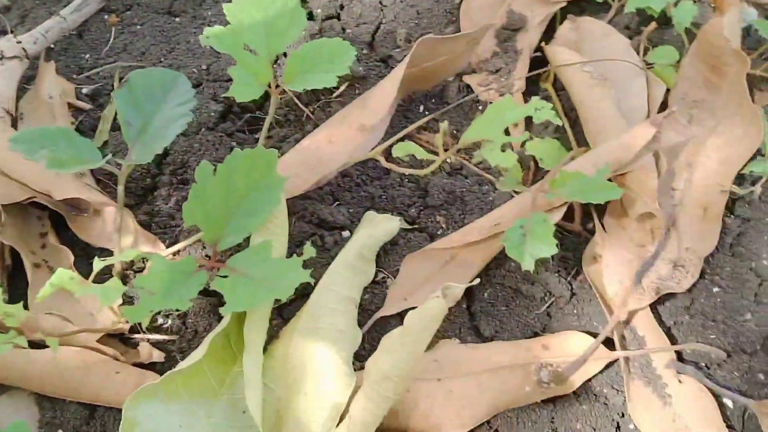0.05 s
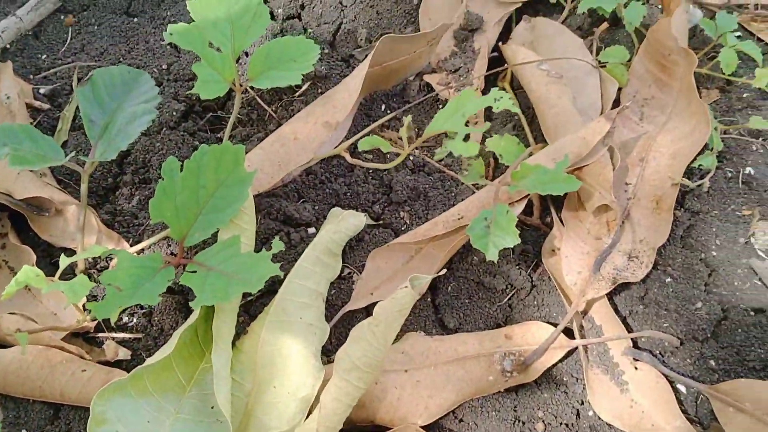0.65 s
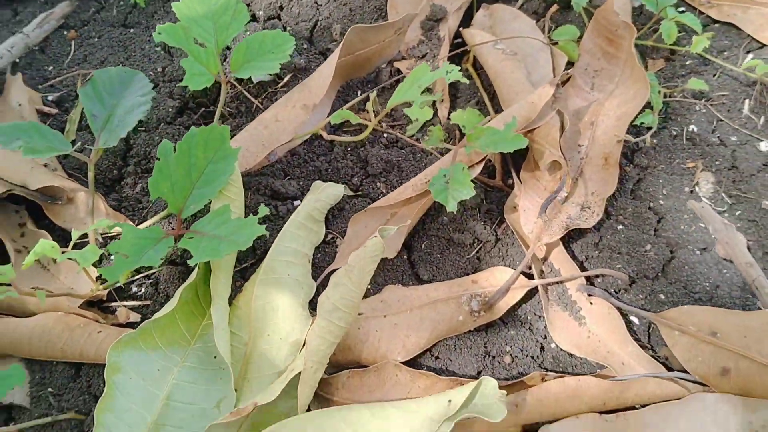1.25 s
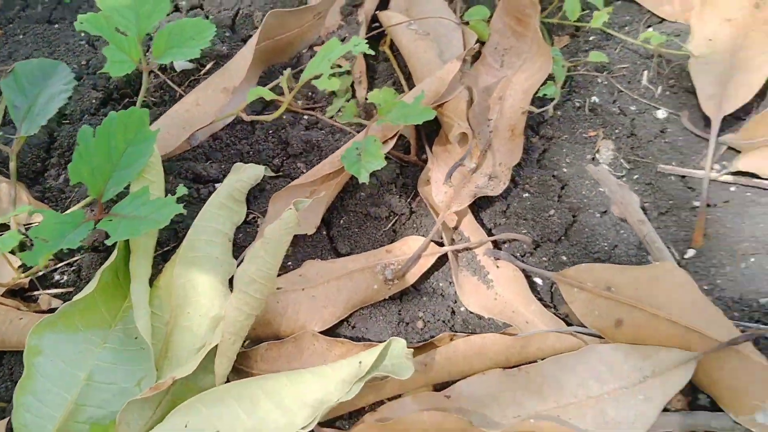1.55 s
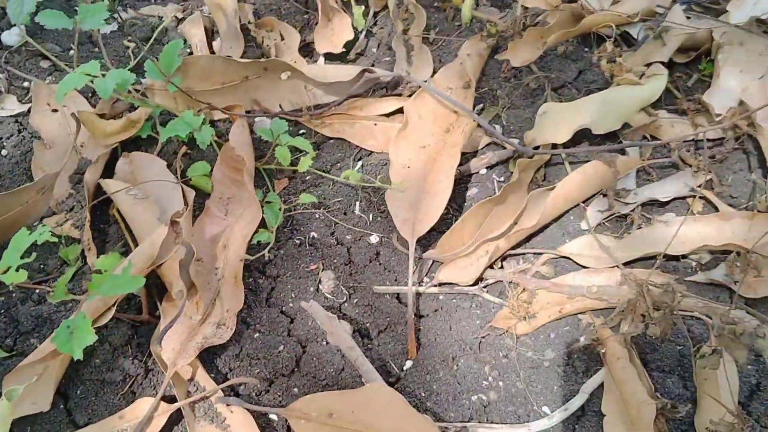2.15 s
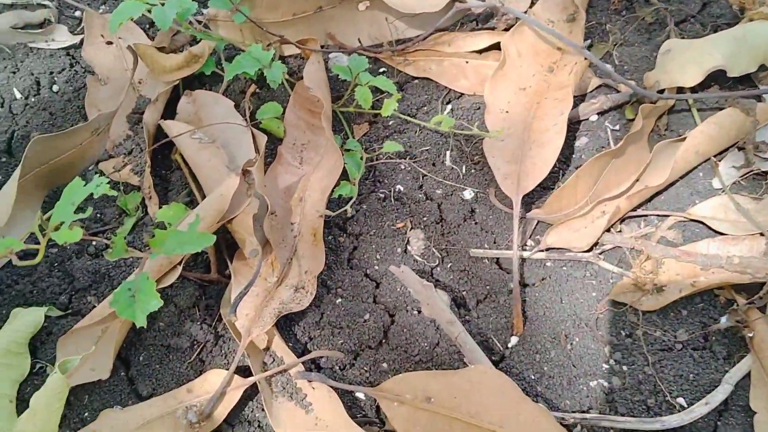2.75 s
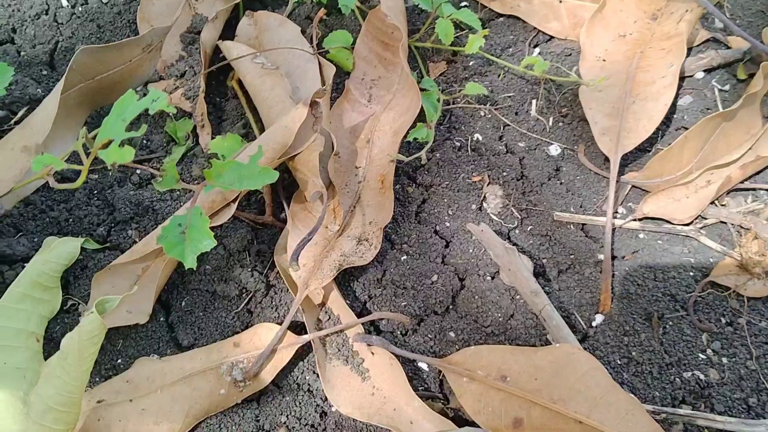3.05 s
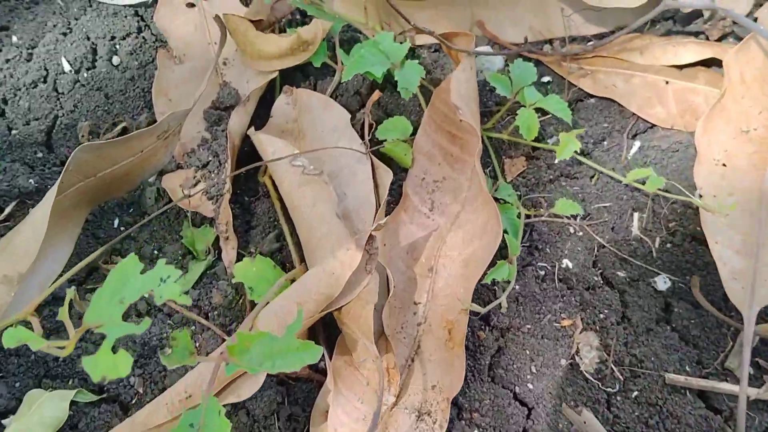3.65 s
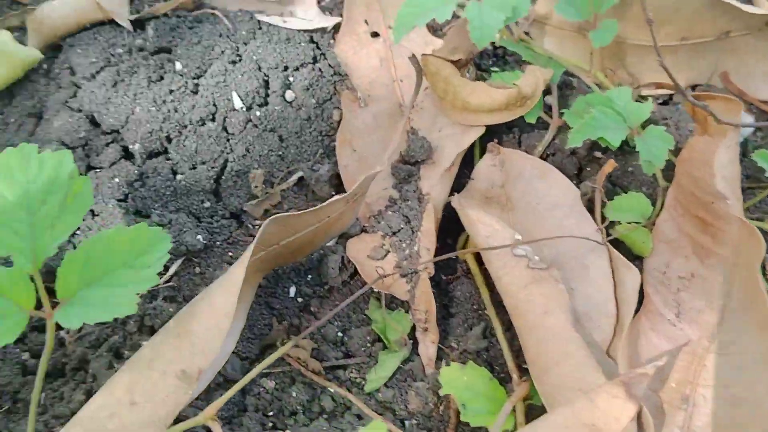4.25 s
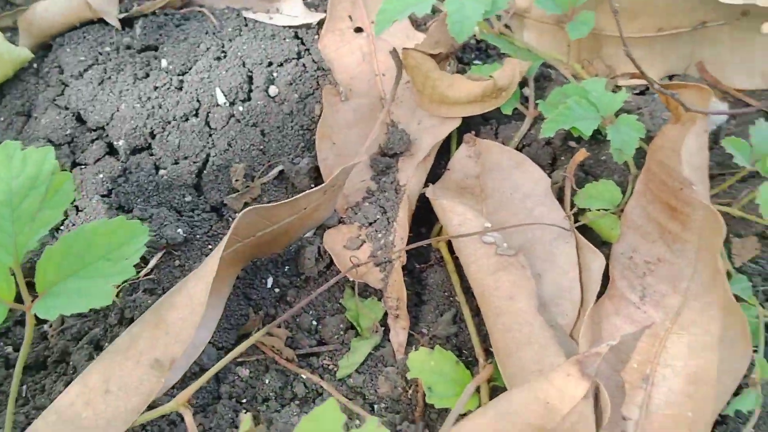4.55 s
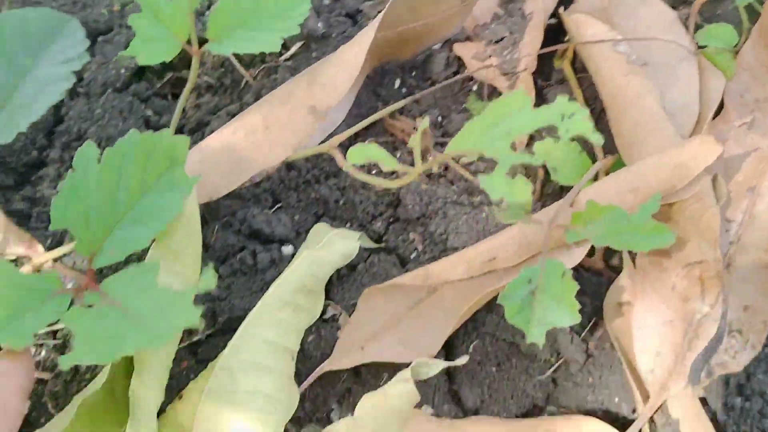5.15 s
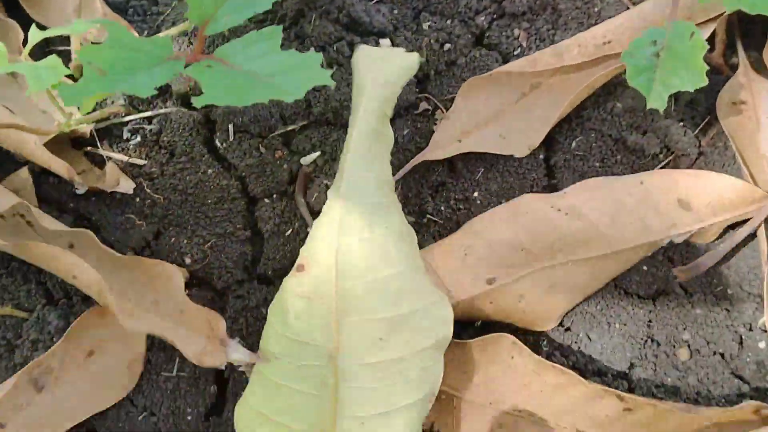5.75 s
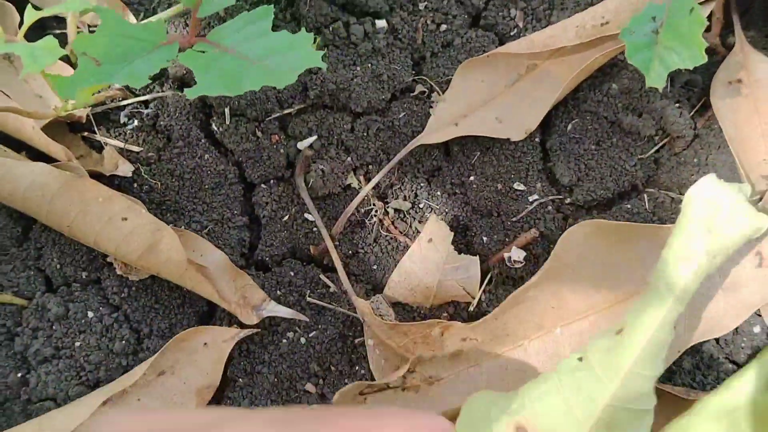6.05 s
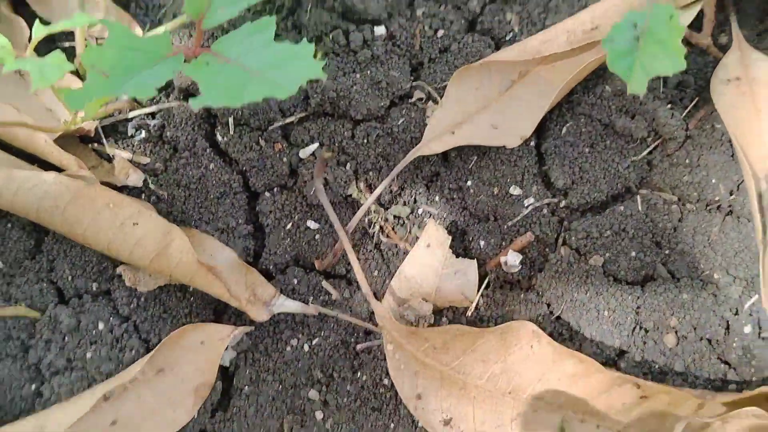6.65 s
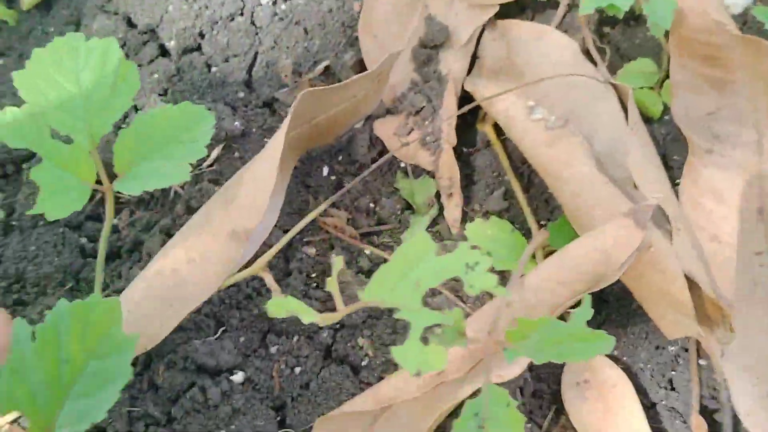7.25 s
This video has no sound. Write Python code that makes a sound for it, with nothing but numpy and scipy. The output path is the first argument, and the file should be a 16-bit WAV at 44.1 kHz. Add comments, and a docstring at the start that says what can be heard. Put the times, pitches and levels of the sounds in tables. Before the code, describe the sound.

Close, irregular bursts of crisp rustling and sharp cracks from dry fallen leaves being moved, over a low outdoor rumble and distant birds.

```python
"""Dry leaves rustle and crackle right at the microphone: a hand pushes a curled leaf through fallen
leaves on bare soil. Edges catch and slip over each other and make the stiff blades ring; veins and rims
give way in sharp snaps, and crumbs tick. Three faint, very high squeaks come and go.
Far off, a few birds whistle over the low rumble and faint hush of the open air."""
import sys
import numpy as np
from scipy import signal
from scipy.fft import rfft, irfft
from scipy.io import wavfile

SR = 44100
rng = np.random.default_rng(int(sys.argv[2]) if len(sys.argv) > 2 else 0)


def store_wav(level_fs):
    """Save 16-bit WAV to argv[1]."""
    pcm = np.round(np.clip(np.atleast_2d(level_fs), -1, 1) * 32767)
    wavfile.write(sys.argv[1], SR, pcm.T.astype(np.int16))


N = 330750
TIME = np.arange(N) / SR

# Table levels are relative. Ring, body and rasp are the three bands of the leaf sound (see leaf_parts).
# strokes of the hand: start t/s, slip rate/(1/s), spread of slip sizes/dB, depth of catching/dB
STROKES = [(0, 3100, 4.5, 2.6), (1.441, 3800, 4.5, 2.5), (1.901, 1250, 4, 4.5), (4.55, 5600, 4.5, 0.5),
           (4.831, 5000, 2.5, 1.7), (5.449, 7000, 6, 1.4), (6.151, 1400, 5, 1.5)]
# main resonances of the leaves touched, one table a stroke: f/Hz, width/Hz, weight/dB
NUDGED = [(1150, 170, -3), (2470, 93, 25), (2970, 177, 10), (4750, 125, 0)]
PUSHED = [(535, 47, 2), (1210, 270, 0), (1720, 130, -6), (2250, 17, -4), (2560, 270, 9), (3470, 58, -7),
          (4430, 33, -19), (4800, 85, 7)]
BENT = [(2860, 830, 0)]
GRIPPED = [(1900, 115, 37), (2660, 22, -5), (3600, 360, 19), (3620, 74, 0), (4796, 100, -10)]
DRAGGED = [(1060, 120, -1), (1820, 56, -16), (2870, 300, -1), (5030, 280, -8)]
LIFTED = [(1030, 185, 8), (1810, 85, -2), (2572, 100, 0), (3470, 820, -11)]
CRUMPLED = [(1080, 37, 1), (1640, 93, 9), (3030, 78, 15)]
# broad colour of dry leaf on leaf, close up: f/Hz, level/dB
LEAF_COLOUR = [(150, -41), (250, 18.5), (329, 1), (516, 0), (691, -3), (1160, -4), (1530, -6.5), (1780, -6),
               (2560, -2), (3380, -1), (4300, -10), (5110, -11.5), (6850, -22.5), (9340, -17), (15400, -26)]
# short shoves: full force t/s, rise/s, hold/s, fall/s, ring/dB, body/dB, rasp/dB
SHOVES = [(0.533, 0.39, 0.3, 0.22, -61, -51, -62), (0.78, 0.024, 0.035, 0.38, -44, -42.5, -48.5),
          (1.077, 0.074, 0.012, 0.13, -28, -32.5, -35), (1.214, 0.031, .01, 0.038, -29.5, -33.5, -43),
          (1.271, 0.015, 0.046, 0.13, -33, -32.5, -36.5), (1.379, 0.045, 0.037, 0.053, -22, -36, -38),
          (1.467, 0.046, 0.0089, 0.26, -28.5, -29.5, -32.5), (1.571, 0.18, 0.012, 0.049, -26, -23, -51),
          (1.687, 0.084, 0.016, 0.18, -24, -27, -30.5), (1.974, 0.059, 0.076, 0.051, -32, -36, -35.5),
          (2.15, 0.0089, .005, 0.074, -35, -35.5, -36.5), (2.65, 0.12, .04, .1, -35, -39, -44),
          (2.734, .06, 0.022, 0.29, -35, -39.5, -35), (2.88, 0.074, 0.0086, 0.095, -35, -39, -37),
          (3.116, 0.32, 0.16, .45, -44, -40, -41.5), (3.481, .06, .01, 0.22, -40.5, -40, -45),
          (3.916, 0.11, .03, 0.11, -50, -48, -50), (4.49, 0.66, 0.088, .15, -49.5, -46, -51),
          (6.039, 0.022, .008, 0.048, -23, -29.5, -31), (6.556, 0.47, 0.039, .2, -49.5, -49.5, -57),
          (7.39, .15, 0.035, .3, -47.5, -52, -55)]
# three long drags through the litter, one curve each: t/s, ring/dB, body/dB, rasp/dB
DRAGS = [
    [(4.59, -53, -44, -48), (4.622, -28, -29, -31), (4.69, -32, -36, -32), (4.724, -25.5, -25, -26),
     (4.8, -28, -35, -33), (4.842, -20.5, -24.5, -25), (5.116, -19, -27, -25.5), (5.284, -24, -29.5, -29),
     (5.332, -31.5, -38.5, -36), (5.37, -23, -22, -26), (5.45, -44, -54, -51)],
    [(5.47, -49, -62, -59), (5.48, -37, -39, -43), (5.514, -41.5, -43, -43), (5.54, -26.5, -27.5, -37),
     (5.57, -37, -42, -51), (5.586, -30.5, -36, -33), (5.76, -15.5, -22.5, -26), (5.918, -28, -31.5, -26),
     (5.94, -40.5, -43, -49), (5.992, -30, -31, -29), (6.02, -36, -34, -39)],
    [(6.6, -43.5, -43, -49), (6.632, -48.5, -45, -57), (6.788, -33, -36, -35), (6.878, -37, -48.5, -44.5),
     (6.952, -31.5, -35, -26.5), (7.028, -41, -43, -43.5), (7.076, -35.5, -40, -39),
     (7.15, -35.5, -35, -42), (7.21, -38.5, -44, -37), (7.226, -44, -47, -47), (7.3, -55, -54, -57.5)],
]
# the litter at rest: ring/dB, body/dB, rasp/dB
REST_DB = (-65, -56.5, -62)
# the main snaps of veins and rims: t/s, blade f/Hz, ring/dB, body/dB, rasp/dB
SNAPS = [(.5655, 3500, -60, -48, -47), (.62, 3500, -66, -40, -42), (.7828, 5500, -25, -36, -27),
         (.8938, 2007, -29.5, -42.5, -46), (1.0896, 2440, -19.5, -37, -40), (1.2077, 2960, -20, -24.5, -34),
         (1.3113, 3070, -21, -30, -41), (1.4733, 3380, -25, -26, -31), (1.591, 2470, -19.5, -38, -44),
         (1.5726, 2560, -30, -17.5, -40), (1.7067, 2400, -17, -14, -22), (1.7164, 2500, -14.5, -13, -26),
         (1.725, 3660, -15.5, -19, -22), (1.8463, 2430, -33.5, -32, -35.5), (2.0078, 3300, -26, -30, -32),
         (2.153, 3100, -35, -38, -33), (2.5758, 2560, -38.5, -40, -44), (2.6247, 2730, -31, -46, -36),
         (2.6485, 2740, -26.5, -30, -33.5), (2.701, 2250, -24, -34, -33), (2.711, 2280, -24, -35, -34),
         (2.719, 3400, -26.5, -45, -28), (2.73, 4800, -31, -38, -29), (2.7607, 1720, -23, -25, -26.5),
         (2.7988, 3330, -28.5, -31.5, -31), (2.923, 3230, -38, -48, -25), (3.082, 3110, -37, -50.5, -30),
         (3.131, 3100, -51, -25, -27.5), (3.2116, 3470, -22, -38, -23), (3.2802, 2350, -42, -30, -43),
         (3.4904, 2770, -25, -40, -25.5), (3.7054, 2690, -43, -55, -39), (3.9165, 3120, -30.5, -45, -33.5),
         (4.472, 2290, -34, -41, -58), (4.504, 1900, -31.5, -36, -30.5), (4.6242, 1850, -27, -28, -33),
         (4.7247, 2000, -25, -27, -26), (4.9165, 2620, -20, -19.5, -24), (4.962, 2900, -14.5, -40, -33),
         (5.0018, 2560, -17, -24, -35), (5.0715, 2910, -12.5, -30, -27), (5.0781, 2860, -10, -37, -22),
         (5.1358, 1870, -31, -15, -38), (5.1624, 1920, -29, -25, -32), (5.2235, 3200, -17.5, -30, -33),
         (5.3632, 1820, -22, -14, -28), (5.376, 3630, -23, -23, -24), (5.4797, 2180, -44, -28, -34),
         (5.5418, 1970, -32, -42, -34), (5.9203, 2620, -25, -27, -28), (5.9605, 2490, -28, -41, -28.5),
         (6.034, 3150, -15.5, -37, -28), (6.0399, 2100, -20.5, -23.5, -23.5), (6.5787, 4040, -33, -48, -39),
         (6.6997, 4370, -33, -29.5, -27.5), (6.7588, 3820, -29, -50, -24), (6.7895, 3100, -27, -36, -24),
         (7.0793, 1962, -45, -38, -24.5), (7.1211, 2860, -25.5, -33, -32),
         (7.1942, 2360, -28.5, -41.5, -29), (7.3787, 4040, -29, -40, -28), (7.3898, 1610, -22, -30.5, -23)]
# faint high squeaks: start t/s, length/s, f/Hz, level/dB
SQUEAKS = [(.3, 0.16, 15100, -66), (0.568, 0.18, 14800, -65), (4.24, .18, 13800, -63)]
# partials of a squeak: ratio to its pitch, level/dB
SQUEAK_PARTIALS = [(.63, 0), (.79, -1), (1, 5)]
# distant bird calls: start t/s, length/s, first f/Hz, middle f/Hz, last f/Hz, level/dB
BIRD_CALLS = [(0, 0.094, 1150, 1114, 970, -47), (0.222, 0.1, 932, 1210, 980, -44),
              (.795, 0.039, 3770, 3300, 2930, -36), (0.891, 0.053, 3800, 3350, 2980, -40),
              (1.006, 0.054, 3690, 3230, 2960, -36), (3.03, 0.19, 960, 1190, 1080, -44.5),
              (3.21, 0.18, 1080, 1170, 1045, -44), (3.45, .12, 1028, 1213, 1080, -45),
              (3.97, 0.058, 3600, 3220, 2800, -50), (4.078, 0.056, 3650, 3170, 2900, -46),
              (4.192, 0.065, 3750, 3200, 2830, -47.5), (4.317, 0.078, 3700, 3200, 2750, -45)]
# colour of still outdoor air: f/Hz, level/dB
AIR_COLOUR = [(15, -73), (25, -46), (136, 0), (233, -6), (273, -10.5), (388, -18), (420, -17.5), (468, -22),
              (759, -34), (993, -33), (1700, -29), (3070, -35), (4130, -46), (9240, -77), (15400, -44.5)]
# swell of the low rumble: t/s, level/dB
RUMBLE_SWELL = [(0.0, -36), (1.06, -34), (1.57, -29.5), (1.79, -35.5), (4.58, -34.5), (4.61, -30.5),
                (5.37, -31.5), (5.45, -36.5), (5.64, -27.5), (6.25, -36), (7.0, -27), (7.5, -32.5)]

BODY_LOW_HZ, BODY_TOP_HZ, RING_TOP_HZ = 360, 1834, 6770
FOLD_DB, FOLD_SPACING_HZ = 2.4, 210


def rubbing(stir_db, trim_db, shift_db):
    """Leaf on leaf at the microphone: slips ring the blades, and the colour shifts as the contact wanders."""
    gains = [from_db(curve + db + shift_db * drift(140)) for curve, db in zip(stir_db, trim_db)]
    stroke_now = np.searchsorted([row[0] for row in STROKES[1:]], TIME)
    out = np.zeros(N)
    for k, blade in enumerate((NUDGED, PUSHED, BENT, GRIPPED, DRAGGED, LIFTED, CRUMPLED)):
        _, per_s, spread_db, catch_db = STROKES[k]
        now = stroke_now == k
        force = slips(per_s, spread_db, catch_db, smooth_db=-3.5)[now]
        sound = travelling_contact(force, blade)
        out[now] = sum(gain[now] * rms_one(part) for gain, part in zip(gains, leaf_parts(sound)))
    return out


def slips(per_s, spread_db, catch_db, smooth_db):
    """Many small slips and a few large ones over smooth sliding, all stronger where an edge catches."""
    sizes = from_db(spread_db * np.minimum(rng.exponential(1, N), 3)) * rng.choice([-1, 1], N)
    clicks = rms_one(sizes * (rng.random(N) < per_s / SR))
    sliding = from_db(smooth_db) * rng.standard_normal(N)
    return (clicks + sliding) * from_db(catch_db * drift(220))


def travelling_contact(force, blade, size=1100):
    """The contact moves on to new folds some forty times a second, each with its own ring."""
    out = np.zeros(len(force) + SR)
    for at in range(0, len(force), size):
        response = rms_one(leaf_response(blade, lift_db=3, widen=1.0))
        sound = signal.fftconvolve(force[at:at + size], response)
        out[at:at + len(sound)] += sound
    return out[:len(force)]


def leaf_response(resonances, lift_db, widen, count=100):
    """A tapped leaf: broad colour, main resonances of the blade and chance ones of the folds."""
    folds_db = FOLD_DB * rng.standard_normal(count)

    def gain(hz):
        peaks = sum(from_db(db / 2) / (1 + (2 * (hz - f) / (width * widen)) ** 2)
                    for f, width, db in resonances)
        folds = from_db(np.interp(hz / FOLD_SPACING_HZ, np.arange(count), folds_db))
        return gain_at(LEAF_COLOUR, hz) * np.sqrt(1 + from_db(lift_db) ** 2 * peaks) * folds
    return impulse(gain, size=2048)


def leaf_parts(x):
    """Split into the ring of the blade, the hollow body of the curl and the rasp of the edge."""
    return (cut(x, [BODY_TOP_HZ, RING_TOP_HZ], "band", order=4),
            cut(x, [BODY_LOW_HZ, BODY_TOP_HZ], "band", order=4),
            cut(x, RING_TOP_HZ, "high", order=4))


def stirring(swell_db, drag_db, let_go_db_per_s, size=7500):
    """Ring, body and rasp in dB over time: shoves and drags add their power to the resting litter's."""
    t = np.linspace(0, TIME[-1], size)
    moves = [np.outer(REST_DB, np.ones(size))]
    for s, rise, hold, fall, *levels in SHOVES:
        away = np.maximum(s - t, 0) / rise + np.maximum(t - s - hold, 0) / fall
        moves.append(np.array(levels)[:, None] - swell_db * away)
    for drag in DRAGS:
        s, *levels = np.transpose(drag)
        let_go = let_go_db_per_s * np.abs(t - np.clip(t, s[0], s[-1]))
        moves.append(np.array([np.interp(t, s, level) for level in levels]) + drag_db - let_go)
    total_db = 10 * np.log10(np.sum(from_db(moves) ** 2, axis=0))
    return np.array([np.interp(TIME, t, part) for part in total_db])


def snaps(rows, trim_db, rise_s, tear_t60, settle_db, settle_t60, size=4096):
    """A crack gathers, runs for a few milliseconds and rings the blade; the leaf settles with a rustle."""
    lead = size // 32
    out = np.zeros(N + size)
    t = (np.arange(size) - lead) / SR
    after = np.maximum(t - rise_s, 0)
    gather = np.exp(2 * np.minimum(t / rise_s - 1, 0))
    tear = from_db(-60 * after / tear_t60)
    rustle = from_db(settle_db - 60 * after / settle_t60)
    envelope = gather * np.hypot(tear, rustle)
    attack = (t > 0) & (t < .005)   # a snap's levels hold for its first 5 ms
    for s, hz, *levels in rows:
        fractures = rng.laplace(size=size) * envelope
        blade = leaf_response([(hz, 520, 0)], lift_db=13, widen=0.54)
        sound = signal.fftconvolve(fractures, blade)[:size]
        at = int(s * SR) - lead
        for part, level, db in zip(leaf_parts(sound), levels, trim_db):
            out[at:at + size] += from_db(level + db) * part / np.sqrt(np.mean(part[attack] ** 2))
    return out[:N]


def small_snaps(stir_db, per_s, from_rasp_db, over_db, most_db, spread_db, pitch_hz, octaves, count=400):
    """Rows for snaps(): while the litter is stirred, small veins give way at random."""
    rows = []
    for (when, luck), (pitch, *chance) in zip(rng.random((count, 2)), rng.standard_normal((count, 4))):
        at = int(when * (N - 1))
        stirred = stir_db[2, at] > from_rasp_db and at > SR // 10
        if stirred and luck < per_s * TIME[-1] / count:
            levels = np.minimum(stir_db[:, at] + over_db, most_db) + spread_db * np.array(chance)
            rows.append((at / SR, pitch_hz * 2 ** (octaves * pitch), *levels))
    return rows


def crumbs(rasp_db, per_s, over_db, most_db, tick_t60, low_hz, high_hz, count=5, size=512):
    """Crumbs of leaf tick thinly, each size at its own pitch, louder when the litter is stirred."""
    level_db = np.minimum(rasp_db + over_db, most_db) + 3 * rng.standard_normal(N)
    fade = from_db(-60 * np.arange(size) / SR / tick_t60)
    out = np.zeros(N)
    for hz in np.geomspace(low_hz, high_hz, count):
        clicks = from_db(level_db) * (rng.random(N) < per_s / count / SR)
        band_hz = [hz / 2 ** (1 / 3), hz * 2 ** (1 / 3)]
        ring = rms_one(cut(rng.standard_normal(N), band_hz, "band", order=1))
        out += signal.fftconvolve(clicks, fade)[:N] * ring
    return out


def squeaks(waver, roughness):
    """Thin, unsteady whistles at the very top, swelling and fading."""
    out = np.zeros(N)
    wobble = 1 + waver * drift(30) + roughness * drift(1500)
    for s, length, hz, db in SQUEAKS:
        now = (TIME >= s) & (TIME < s + length)
        swell = from_db(db) * np.sqrt(2 * np.sin(np.pi * (TIME[now] - s) / length))
        phase = 2 * np.pi * np.cumsum(hz * wobble[now]) / SR
        out[now] += swell * sum(from_db(level) * np.sin(ratio * phase) for ratio, level in SQUEAK_PARTIALS)
    return out


def birds(level_db, waver, echo_t60, echo_db):
    """Thin gliding whistles far from the microphone, blurred by the trees between."""
    out = np.zeros(N)
    wobble = 1 + waver * drift(200)
    for s, length, first, middle, last, db in BIRD_CALLS:
        now = (TIME >= s) & (TIME < s + length)
        progress = (TIME[now] - s) / length
        glide = np.polyfit([0, .5, 1], [first, middle, last], 2)
        hz = np.polyval(glide, progress) * wobble[now]
        swell = from_db(db + level_db) * np.sqrt(2 * np.sin(np.pi * progress))
        out[now] += swell * np.sin(2 * np.pi * np.cumsum(hz) / SR)
    t = TIME[:SR // 2]
    trees = rng.standard_normal(len(t)) * from_db(-60 * t / echo_t60)
    return out + from_db(echo_db) * signal.fftconvolve(out, trees / np.linalg.norm(trees))[:N]


def open_air(rumble_trim_db, hush_db, split_hz):
    """The ambience of the place: a swelling rumble under an even, dull hush."""
    air = signal.fftconvolve(rng.standard_normal(N), impulse(lambda hz: gain_at(AIR_COLOUR, hz)))[:N]
    swell_db = np.interp(TIME, *np.transpose(RUMBLE_SWELL))
    rumble = from_db(swell_db + rumble_trim_db) * rms_one(cut(air, split_hz, "low", order=3))
    hush = from_db(hush_db) * rms_one(cut(air, split_hz, "high", order=3))
    return rumble + hush


def from_db(db):
    """Decibels to gain."""
    return 10 ** (np.asarray(db) / 20)


def rms_one(x):
    """Scale to unit rms."""
    return x / np.sqrt(np.mean(x ** 2) + 1e-20)


def gain_at(points, hz):
    """Gain of an (f/Hz, level/dB) spectrum at any frequency."""
    f, db = np.transpose(points)
    return from_db(np.interp(np.log(hz + 1), np.log(f), db))


def drift(per_s):
    """A random wander of unit rms that takes a new course per_s times a second."""
    knots = rng.standard_normal(N // 20)
    return rms_one(np.interp(TIME * per_s, np.arange(len(knots)), knots))


def cut(x, hz, kind, order):
    """Butterworth filter."""
    return signal.sosfilt(signal.butter(order, hz, kind, fs=SR, output="sos"), x)


def impulse(gain_of_hz, size=4096):
    """Minimum-phase impulse response with the given gain: it starts at once and rings out."""
    cepstrum = irfft(np.log(gain_of_hz(np.fft.rfftfreq(size, 1 / SR)) + 1e-9))
    cepstrum[1:size // 2] *= 2
    cepstrum[size // 2 + 1:] = 0
    return irfft(np.exp(rfft(cepstrum)))


def scene():
    """One microphone: leaves close in front, birds and open air behind. Triples are ring, body, rasp."""
    stir_db = stirring(swell_db=20, drag_db=-1.5, let_go_db_per_s=600)
    leaves = rubbing(stir_db, trim_db=(-0.56, 0.08, 0.5), shift_db=0.88)
    ticks = crumbs(stir_db[2], per_s=30, over_db=7, most_db=-42, tick_t60=.01, low_hz=5000, high_hz=13000)
    calls = birds(level_db=-5, waver=.03, echo_t60=.1, echo_db=-3)
    air = open_air(rumble_trim_db=0.4, hush_db=-49, split_hz=620)
    whistles = squeaks(waver=.018, roughness=.013)
    small = small_snaps(stir_db, per_s=13, from_rasp_db=-51, over_db=(3, 0, 5), most_db=(-27, -33, -31),
                        spread_db=2.5, pitch_hz=2850, octaves=.3)
    cracks = snaps(SNAPS + small, trim_db=(0, -.3, -.3), rise_s=.0012, tear_t60=.011,
                   settle_db=-17, settle_t60=.05)
    return (leaves + cracks + ticks + whistles + calls + air)[None]


def record(dry, ceiling=1.2, cutoff_hz=15600):
    """The highest peaks are rounded and the top is cut steeply."""
    rounded = ceiling * np.tanh(dry / ceiling)
    return signal.sosfilt(signal.ellip(10, .1, 80, cutoff_hz, fs=SR, output="sos"), rounded)


dry = scene()
out = record(dry)
store_wav(out)
```